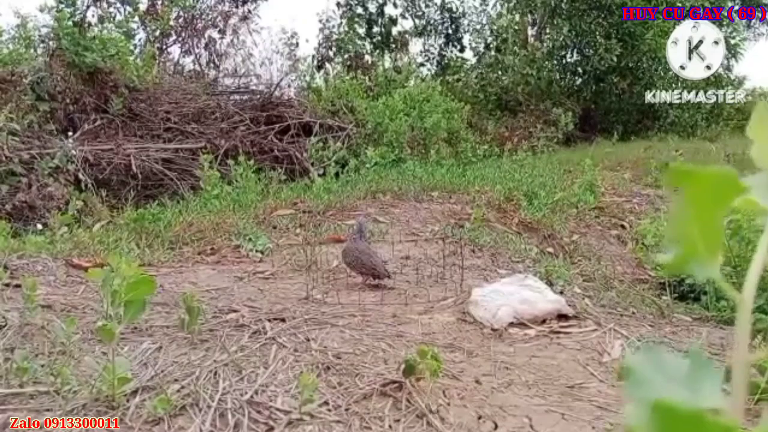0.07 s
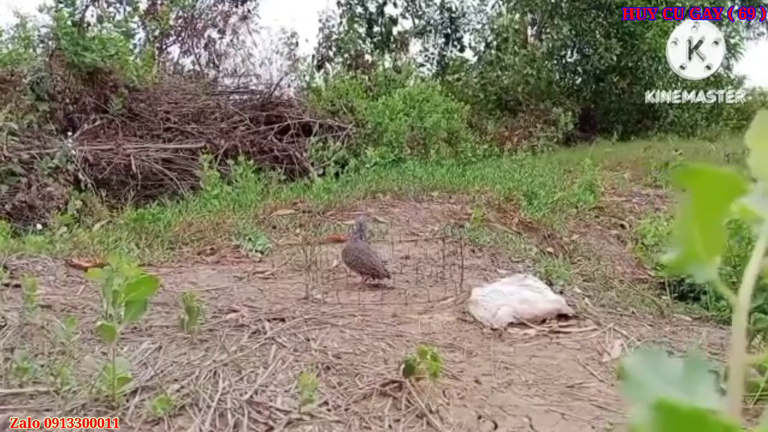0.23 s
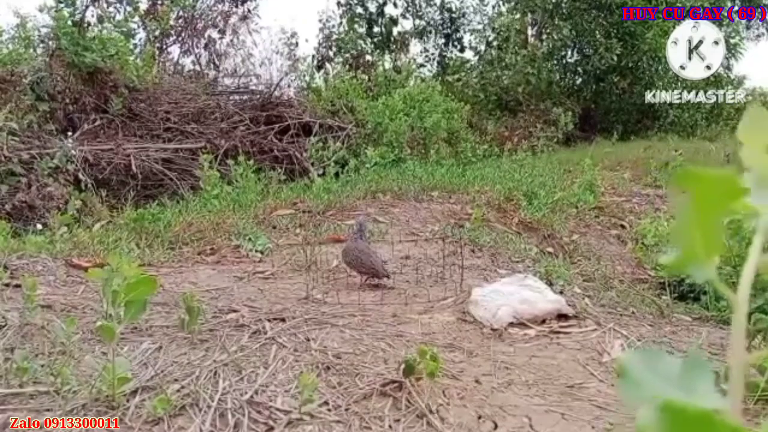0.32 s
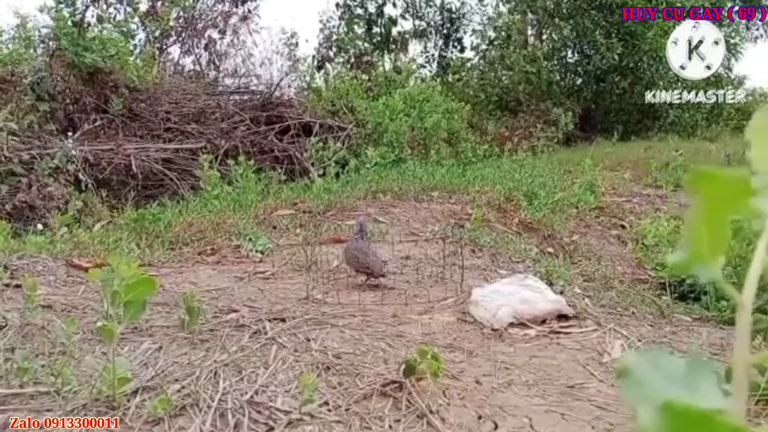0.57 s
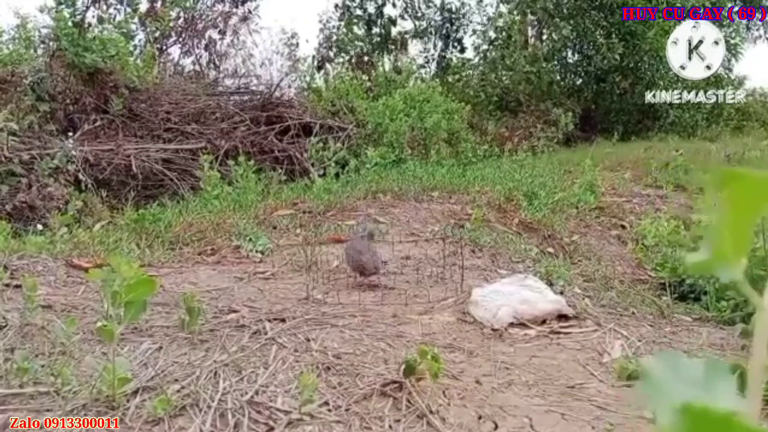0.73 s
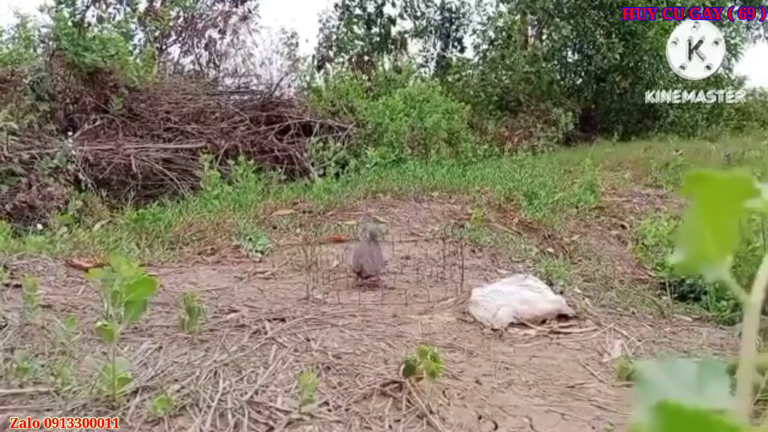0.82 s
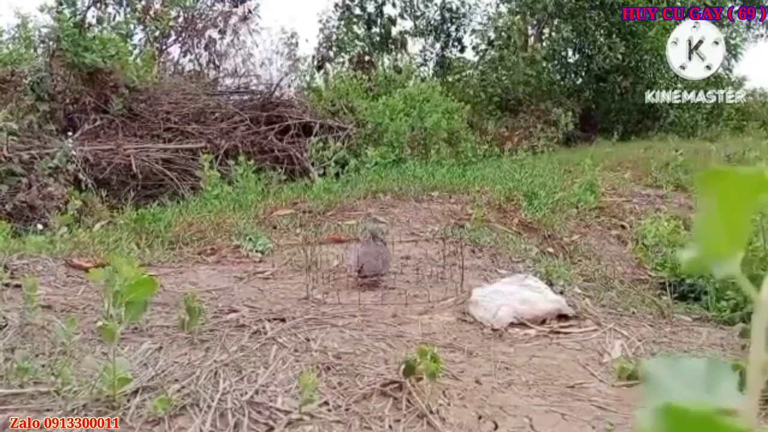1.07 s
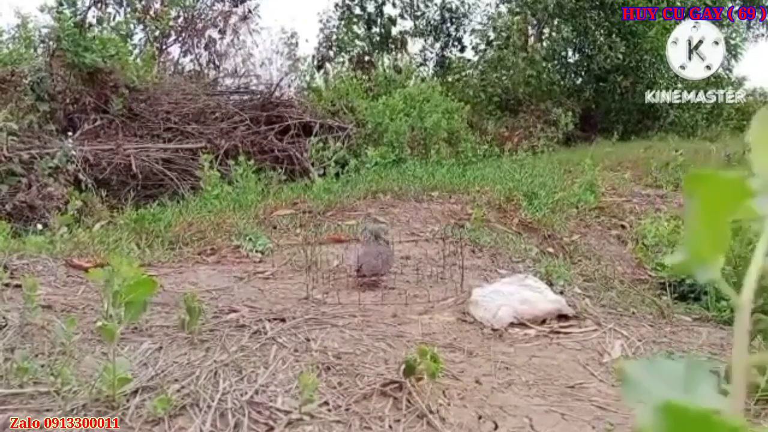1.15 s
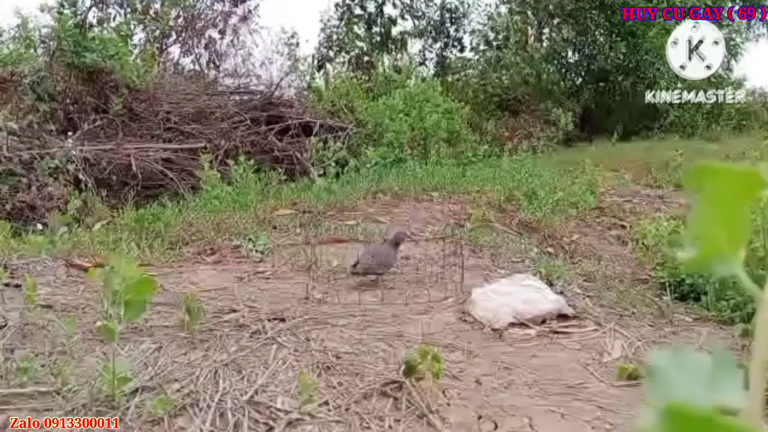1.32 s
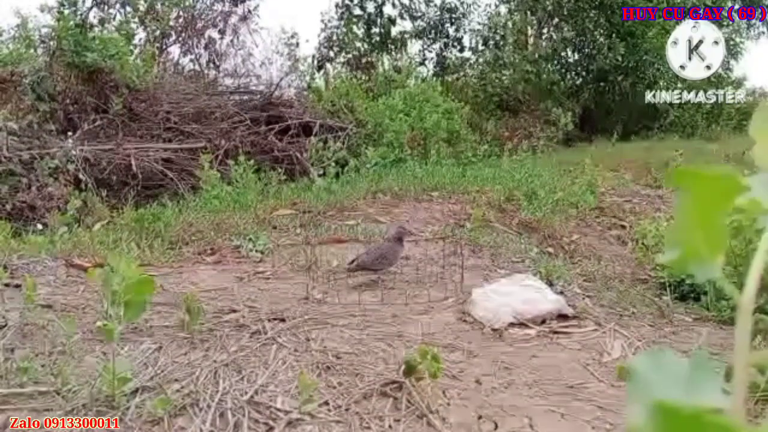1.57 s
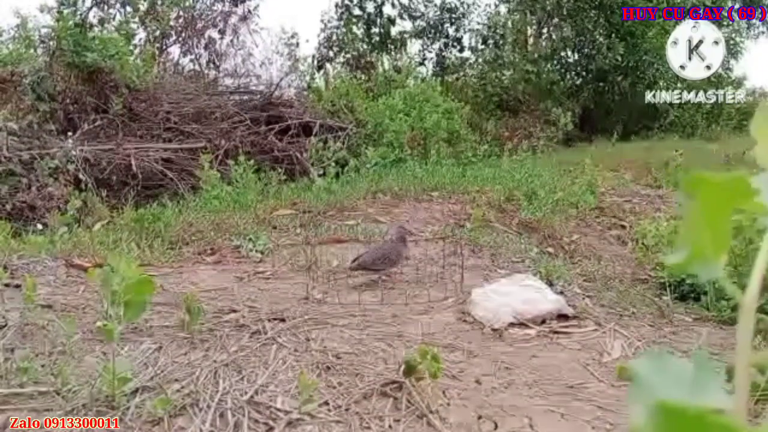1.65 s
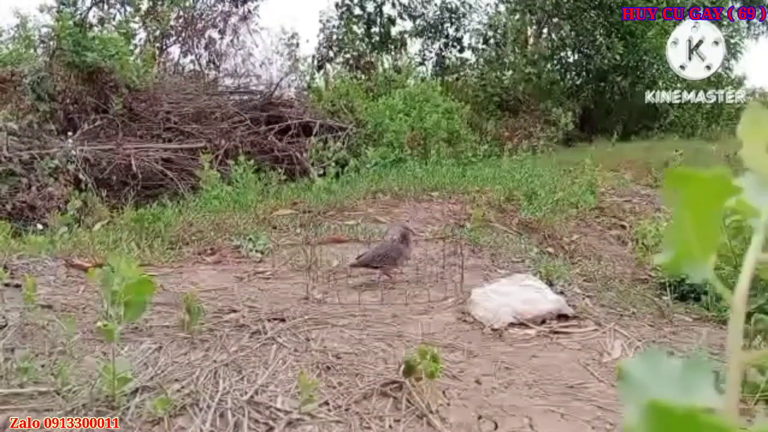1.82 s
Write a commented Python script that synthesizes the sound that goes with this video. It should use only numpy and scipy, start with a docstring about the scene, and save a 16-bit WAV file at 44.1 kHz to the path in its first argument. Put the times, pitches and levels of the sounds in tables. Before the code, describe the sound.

Low wind buffeting outdoors, strongest early on, nearly covering a distant dove coo and tiny bird peeps

```python
"""Leaves and insects hiss from the start: noise in flickering bands. Gusty wind soon joins, made of uneven
impulses coloured and shaped by gusts, and buffets a phone microphone with short pressure swings.
Small birds whistle and peep in arching, gliding sines with an echo; soft ticks, decaying rings, fall between.
Later a far-off dove holds a faint wavering coo, a near sine with breath; more bird notes gather at the end."""
import sys
import numpy as np
from scipy import signal
from scipy.fft import rfft, irfft
from scipy.io import wavfile
from scipy.ndimage import uniform_filter1d, minimum_filter1d

SR = 44100
rng = np.random.default_rng(int(sys.argv[2]) if len(sys.argv) > 2 else 0)


def digitize_waveform(pressure):
    """Quantize a signal to 16-bit integers and store it at the path in sys.argv[1].

    Rows of a 2-D input are taken as channels; values are limited to [-1, 1].
    """
    field = np.atleast_2d(pressure).T
    bounded = np.clip(field, -1, 1)
    quanta = np.round(bounded * 32767).astype(np.int16)
    wavfile.write(sys.argv[1], SR, quanta)


def volts_from_db(level):
    """Convert decibel levels to linear amplitude ratios."""
    exponent = np.asarray(level, float) / 20
    return 10 ** exponent


N = 83790

# hiss colour, relative: f/Hz, level/dB per Hz
HISS_COLOUR = [(400, -30), (560, -6.5), (800, -7), (1100, -12.5), (1400, -9.5), (2070, -15.5), (2900, -20),
               (3900, -26.5), (4700, -35.5), (5800, -31), (7000, -31.5), (7600, -23), (8500, -21),
               (8950, -25), (9200, -31), (11000, -35.5), (13100, -40), (13600, -48), (16000, -59.5)]
# swell of the hiss around its base level: t/s, level/dB
HISS_SWELL = [(0, -23.5), (.07, -13), (.12, -0.5), (.2, 2.5), (.7, 4), (1.35, 3.5), (1.46, -3.5),
              (1.485, -13), (1.53, -0.5), (1.78, 0.5), (1.85, 7), (1.9, -1)]
# wind colour, relative: f/Hz, level/dB per Hz
WIND_COLOUR = [(15, -46.5), (25, -36), (40, -28.5), (60, -10.5), (95, 4.5), (130, 5), (175, 1), (260, -5.5),
               (350, -12.5), (480, -23), (624, -34), (780, -49), (950, -58), (1150, -76), (1500, -100)]
# gusts, before smoothing: t/s, level/dB, own brightness/dB per bent octave above the pivot,
# weight/dB per octave below it
GUSTS = [(0.07, -80, -6, 4), (0.084, -39.5, -6, -8.5), (0.14, -26, 1.5, 4), (0.192, -34, 7, 2.5),
         (0.228, -22.5, -0.5, -6.5), (0.268, -38, 0, -3.5), (0.294, -26, -6, 6), (0.308, -27, -1.5, 2.5),
         (0.334, -43, 8, -6.5), (0.36, -28, -4.5, 6), (0.482, -30.5, -3, -2.5), (0.522, -24.5, 2, -0.5),
         (0.604, -23.5, 0, -1.5), (0.634, -17, 2.5, 6.5), (0.666, -20.5, 4.5, 0.5),
         (0.696, -8.5, 0.5, -0.5), (0.864, -21.5, 2.5, -0.5), (0.926, -33, 0.5, -2.5),
         (1.006, -16, 3.5, -0.5), (1.094, -16.5, -0.5, 3), (1.144, -30, -7.5, -7), (1.2, -17.5, 2.5, 2),
         (1.236, -29, 6.5, -1.5), (1.272, -14.5, -2, -3), (1.348, -26.5, -3, 8), (1.394, -41, -3, -1),
         (1.436, -34, -6.5, -1), (1.492, -61.5, -3, -2), (1.506, -44.5, -10, 9), (1.582, -27, -1, 0.5),
         (1.608, -35.5, 2, 10.5), (1.65, -23.5, -8, -9), (1.68, -26.5, -10, -4), (1.71, -48, 0, -1.5),
         (1.74, -28.5, -10.5, -2.5), (1.818, -29, -6.5, 1.5), (1.9, -43, -17, 3.5)]
# pressure swings, before the low cut: t/s, peak level/dB, f/Hz, cycles from the peak down to exp(-2)
BUFFETS = [(0.143, -17.5, 170, 1.17), (0.228, -20.5, 190, 1.6), (0.301, -16.5, 125, 0.97),
           (0.362, -22.5, 118.4, 0.94), (0.426, -20.5, 231, 0.94), (0.523, -17.5, 150, 1.3),
           (0.588, -14.5, 168.7, 0.7), (0.636, -13.5, 190, 1.05), (0.6975, -5.5, 230, 0.4),
           (0.741, -11.5, 190, 0.83), (0.79, -11.5, 170, 0.57), (1.036, -16, 200, 1.4),
           (1.0823, -22.5, 160, 0.87), (1.201, -15.5, 190, .9), (1.581, -19, 140, 1.63)]
# bird notes: start t/s, length t/s, level/dB, f/Hz, arch f/Hz, glide f/Hz
BIRD_NOTES = [(0.332, .04, -61.5, 5440, 594.5, -150), (0.49, .04, -80.5, 7950, -2, 0.5),
              (0.86, .125, -63, 7790, 96, -100), (0.945, .075, -70, 7120, 2.5, -2),
              (1.07, .022, -72.5, 8550, 7.5, -7.5), (1.24, .03, -77, 8180, 1, 0.5),
              (1.62, .03, -76.5, 8500, 0.5, 3), (0.22, .035, -71, 1730, 3, -0.5),
              (0.84, .05, -68, 1450, -10.5, -6), (1.13, .08, -61, 1082, 3.5, 10),
              (1.15, .05, -74, 2616, -2, 53), (1.79, .06, -64, 891, 20, -3),
              (1.81, .08, -65.5, 1383, -3.5, 5.5), (1.82, .07, -72, 2167, 1, 19.5),
              (1.83, .04, -71.5, 2470, 0.5, -6), (1.83, .06, -66.5, 682, -10, -20),
              (1.816, 0.065, -86, 2880, 4.5, -3.5), (1.827, 0.047, -86, 3610, -6, -9),
              (0.17, .12, -70.5, 809, -4, 36.5), (0.289, 0.23, -70.5, 692, -1, 4.5),
              (0.412, 0.018, -84, 4560, 2.5, -6.5)]
# soft ticks: t/s, level before the soft rise/dB, ring f/Hz, width f/Hz (wider dies faster)
TICKS = [(0.251, -58, 12000, 1000), (0.311, -58, 12000, 1000), (0.6975, -27, 2500, 1800),
         (0.698, -45, 11000, 2500), (1.448, -44, 150, 150), (1.449, -57, 12000, 1500),
         (1.688, -47, 150, 130), (1.89, -45, 150, 150)]
# coo, before its waver: t/s, f/Hz, level/dB
COO = [(0.66, 850, -110), (0.72, 865, -64), (0.78, 885, -55), (0.88, 889, -57), (1.0, 895, -55),
       (1.12, 897, -54), (1.24, 899, -58), (1.275, 895, -74), (1.32, 898, -85), (1.36, 899, -66),
       (1.39, 895, -85), (1.42, 895, -110)]

HISS_DB, HISS_FLICKER_DB = -75, 3
EDDIES_PER_S, EDDY_SPREAD_DB, WIND_FLICKER_DB = 1500, 2, 3.5
BRIGHT_PER_DB, USUAL_GUST_DB = 0.2941, -19  # extra brightness per dB above the usual gust
PIVOT_HZ, TILT_BEND = 135, 1.304  # the octaves above the pivot are raised to this power
EVEN_S = 0.05
LOW_CUT_HZ = 60
NOTE_ROUGH_DB, NOTE_WAVER_HZ = 2, 12
NOTE_BREATH_DB, NOTE_BREATH_HZ = -18, 4500  # breath doubles at this pitch and grows further below it
ECHO_S, ECHO_DB = .02, -17
TICK_RISE_S = .00006
COO_WAVER_DB, COO_WAVER_HZ = 2, 7
BREATH_DB, BREATH_PER_S = -5, 170  # breath level, and rate of its random draws
LIMIT, LIMIT_S = .96, .004  # crest ceiling (full scale = 1), smoothing


def table(rows, col=1):
    """Column of a time table, joined by straight lines."""
    rows = np.array(rows, float)
    return np.interp(np.arange(N) / SR, rows[:, 0], rows[:, col])


def colour(rows, hz):
    """Level in dB of a spectrum table at hz, joined over log frequency."""
    rows = np.array(rows, float)
    return np.interp(np.log(hz), np.log(rows[:, 0]), rows[:, 1], left=-120, right=-120)


def walk(rate):
    """Random levels held 1 / rate s and slewed twice; spread near 1."""
    hold = int(SR / rate)
    steps = np.repeat(rng.standard_normal(N // hold + 1), hold)
    return 1.2 * uniform_filter1d(uniform_filter1d(steps, hold), hold)[:N]


def bands(x, spectrum, first_hz, step, moving_db):
    """Colours x, splits it into overlapping bands, each with its own moving gain; rms 1 when still."""
    hz = np.arange(N // 2 + 1) * SR / N + 1e-3  # offset avoids log of zero
    spec = rfft(x) * volts_from_db(colour(spectrum, hz))
    spec /= np.std(irfft(spec, N))
    out = 0
    for mid in first_hz * 2 ** np.arange(0, 7, step):  # step in octaves
        share = np.clip(1 - np.abs(np.log2(hz / mid)) / step, 0, 1)
        if np.any(share) and colour(spectrum, mid) > -119:
            out = out + irfft(spec * share, N) * volts_from_db(moving_db(mid))
    return out


def bushes():
    """Leaves and insects: a thin noise hiss whose bands flicker independently."""
    def flicker_db(hz):
        return HISS_FLICKER_DB * walk(14)

    hiss = bands(rng.standard_normal(N), HISS_COLOUR, 450, 0.23, flicker_db)
    return hiss * volts_from_db(HISS_DB + table(HISS_SWELL))


def wind():
    """Uneven eddies strike the port; stronger gusts are brighter, bands flicker, the sum is evened."""
    chance = rng.random((3, N))
    strikes = chance[0] < EDDIES_PER_S / SR
    sizes = volts_from_db(-EDDY_SPREAD_DB * np.log(chance[2] + 1e-4))
    eddies = strikes * np.sign(chance[1] - .5) * sizes
    gust_db = table(GUSTS)
    bright = table(GUSTS, col=2) + BRIGHT_PER_DB * (gust_db - USUAL_GUST_DB)
    weight = table(GUSTS, col=3)

    def tilt_db(hz):
        above = max(np.log2(hz / PIVOT_HZ), 0) ** TILT_BEND
        below = max(np.log2(PIVOT_HZ / hz), 0)
        return bright * above + weight * below + WIND_FLICKER_DB * walk(18)

    flow = bands(eddies, WIND_COLOUR, 24.09, 0.3498, tilt_db)
    # divide out the running power so that the gust levels alone set the loudness
    k = int(EVEN_S * SR)
    power = uniform_filter1d(uniform_filter1d(uniform_filter1d(flow ** 2, k), k), k)
    even = flow / np.sqrt(power + 1e-6)
    t = np.arange(N) / SR
    ends = np.minimum((t - .066) / .02, (N / SR - t) / 0.0086)  # fade in and out
    fade = np.sin(np.pi / 2 * np.clip(ends, 0, 1)) ** 2
    return even * uniform_filter1d(volts_from_db(gust_db), k // 4) * fade


def buffets():
    """Pressure swings of about one cycle; a low cut removes their slowest part."""
    t = np.arange(N) / SR
    swings = 0
    for s, db, hz, cycles in BUFFETS:
        bell = np.exp(-((t - s) * hz / cycles) ** 2 * 2)
        swings = swings + volts_from_db(db) * np.cos(2 * np.pi * hz * (t - s)) * bell
    low_cut = signal.butter(2, LOW_CUT_HZ, "high", fs=SR, output="sos")
    return signal.sosfiltfilt(low_cut, swings)


def birds():
    """Sines that arch and glide, wavering with distance, the low ones breathier; one echo."""
    out = np.zeros(N)
    for s, length, db, hz, arch_hz, glide_hz in BIRD_NOTES:
        u = np.clip((np.arange(N) / SR - s) / length, 0, 1)  # progress through the note
        pitch = hz + arch_hz * np.sin(np.pi * u) + glide_hz * u + NOTE_WAVER_HZ * walk(90)
        phase = 2 * np.pi * np.cumsum(pitch) / SR
        tone = volts_from_db(NOTE_ROUGH_DB * walk(120)) * np.sin(phase)
        noise = walk(200) * np.sin(phase) + walk(200) * np.cos(phase)
        breath = volts_from_db(NOTE_BREATH_DB) * (1 + NOTE_BREATH_HZ / hz) * noise
        out += volts_from_db(db) * np.abs(np.sin(np.pi * u)) ** .8 * (tone + breath)
    return out + volts_from_db(ECHO_DB) * np.roll(out, int(ECHO_S * SR))


def ticks():
    """One-sided ringing clicks that rise quickly and die at once."""
    out = 0
    for s, db, hz, width_hz in TICKS:
        t = np.maximum(np.arange(N) / SR - s, 0)
        rise = 1 - np.exp(-t / TICK_RISE_S)
        decay = np.exp(-2 * np.pi * width_hz * t)
        out = out + volts_from_db(db) * rise * np.cos(2 * np.pi * hz * t) * decay
    return out


def dove():
    """A near sine that wavers over the distance, with a breathy band of noise around it."""
    phase = 2 * np.pi * np.cumsum(table(COO) + COO_WAVER_HZ * walk(50)) / SR
    tone = volts_from_db(COO_WAVER_DB * walk(60)) * np.sin(phase)
    breath = walk(BREATH_PER_S) * np.sin(phase) + walk(BREATH_PER_S) * np.cos(phase)
    return np.sqrt(2) * volts_from_db(table(COO, col=2)) * (tone + volts_from_db(BREATH_DB) * breath)


def scene():
    """All sources sum at one microphone."""
    return (bushes() + wind() + buffets() + birds() + ticks() + dove())[None]


def low_pass(x):
    """Removes everything above the highest recorded frequency."""
    return signal.sosfilt(signal.butter(12, 13990, fs=SR, output="sos"), x)


def record(dry):
    """A look-ahead limiter turns down around the highest crests to finish the mix."""
    k = int(LIMIT_S * SR)
    need = np.minimum(1, LIMIT / (np.abs(dry) + 1e-9))
    held = minimum_filter1d(need, 2 * k + 1, axis=1)
    gain = uniform_filter1d(uniform_filter1d(held, k, axis=1), k, axis=1)
    return low_pass(dry * gain)


dry = scene()
out = record(dry)
digitize_waveform(out)
```